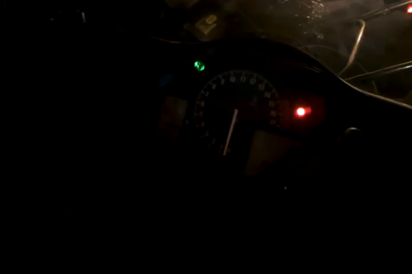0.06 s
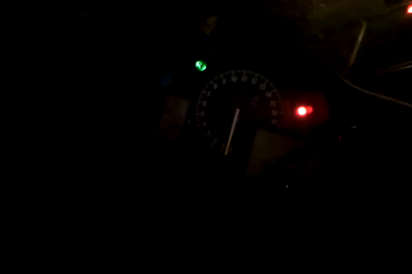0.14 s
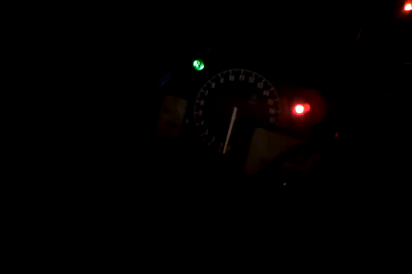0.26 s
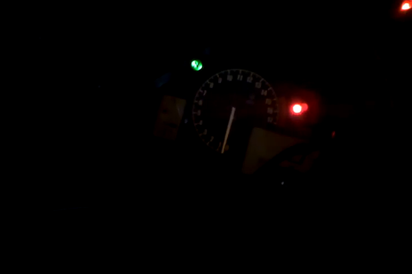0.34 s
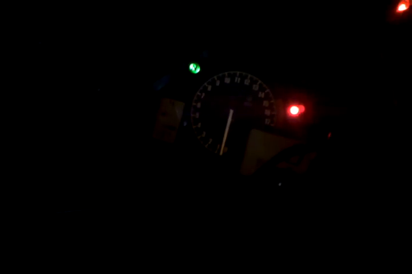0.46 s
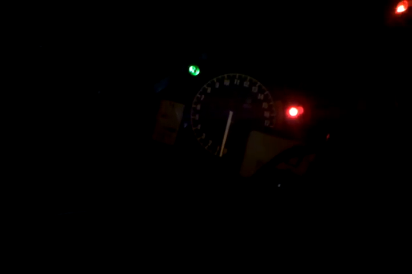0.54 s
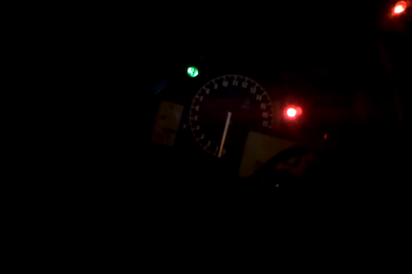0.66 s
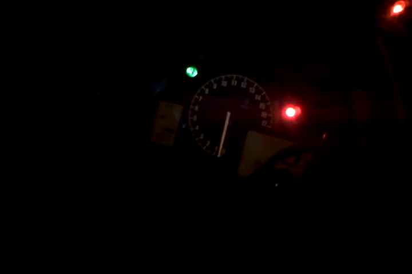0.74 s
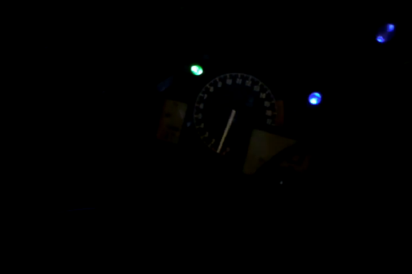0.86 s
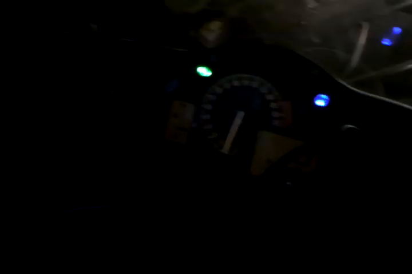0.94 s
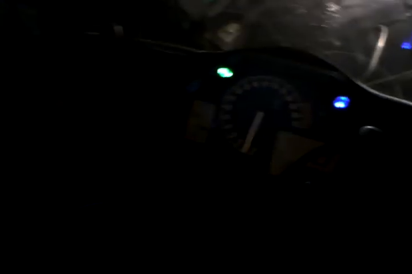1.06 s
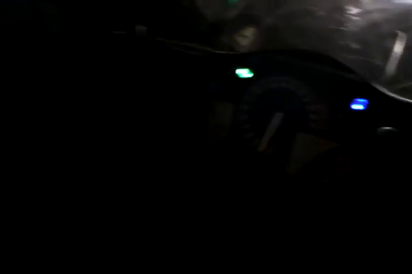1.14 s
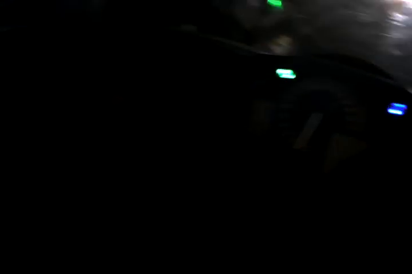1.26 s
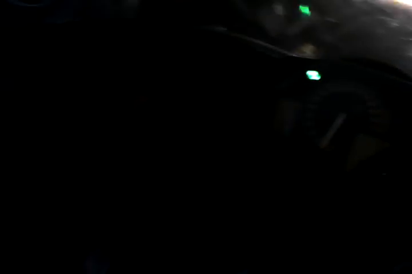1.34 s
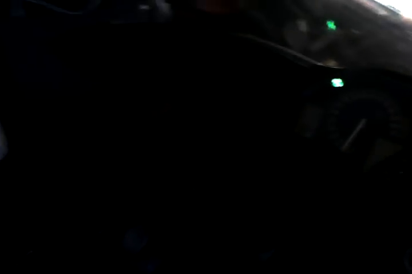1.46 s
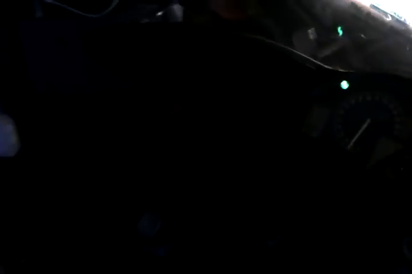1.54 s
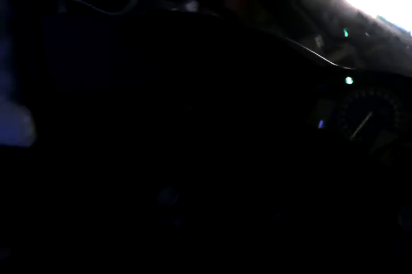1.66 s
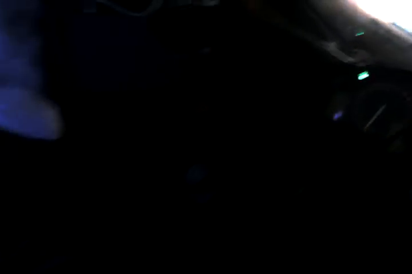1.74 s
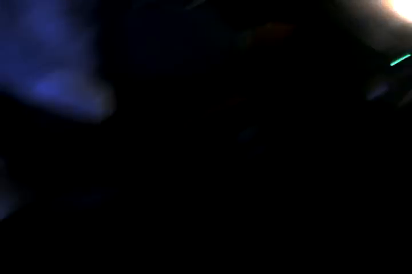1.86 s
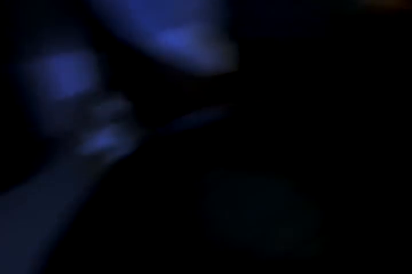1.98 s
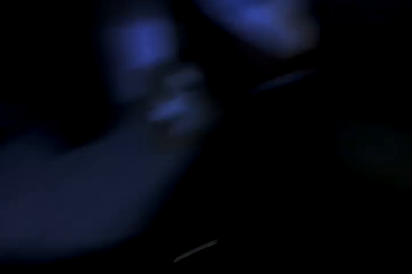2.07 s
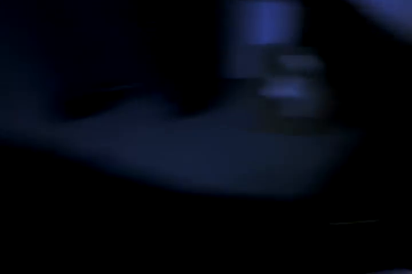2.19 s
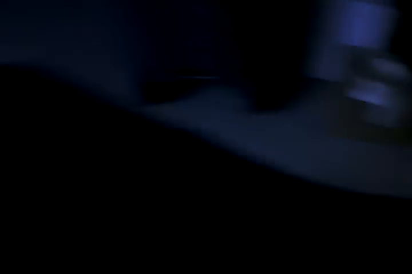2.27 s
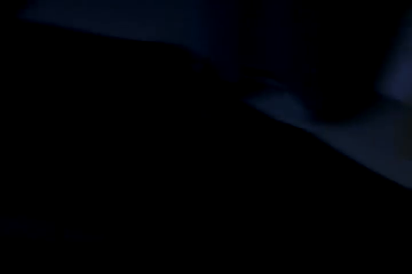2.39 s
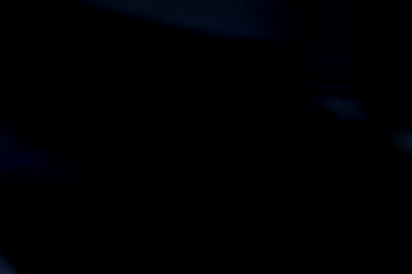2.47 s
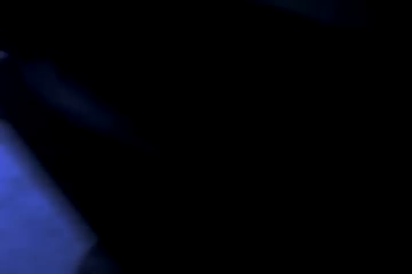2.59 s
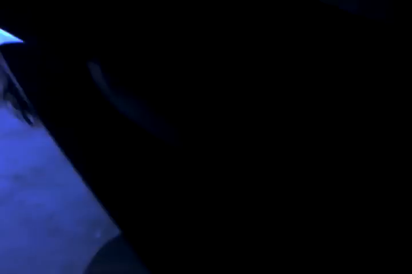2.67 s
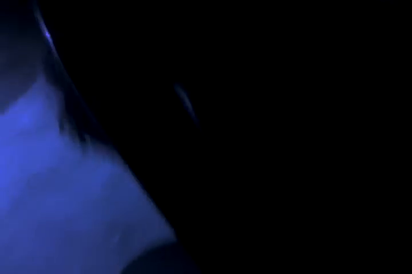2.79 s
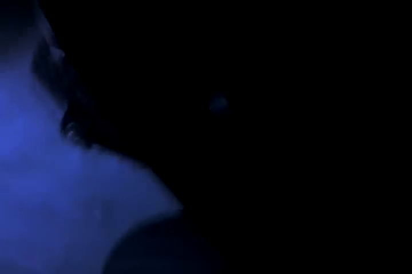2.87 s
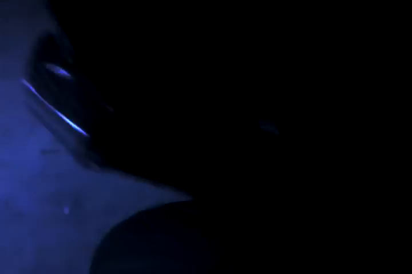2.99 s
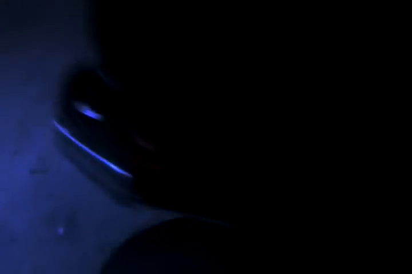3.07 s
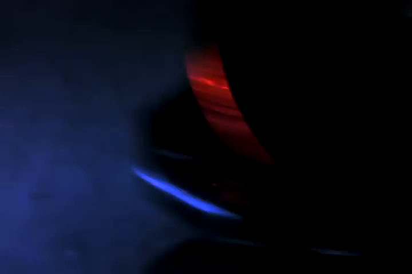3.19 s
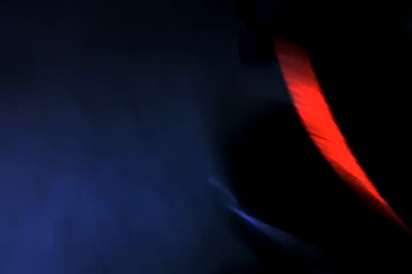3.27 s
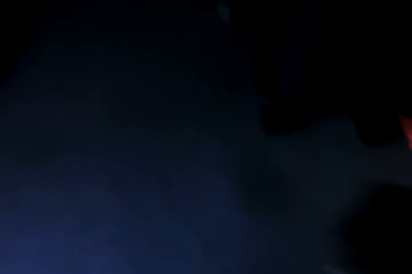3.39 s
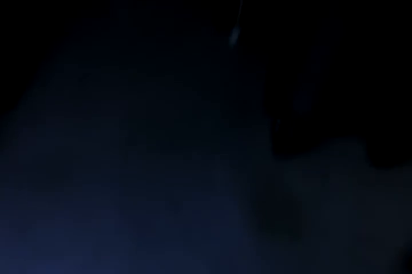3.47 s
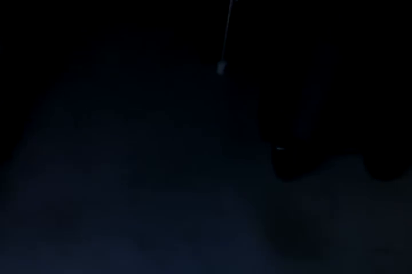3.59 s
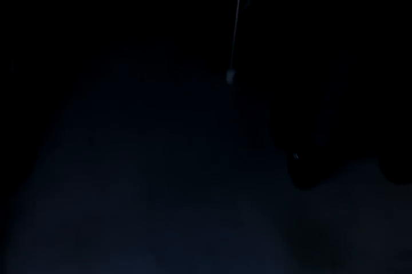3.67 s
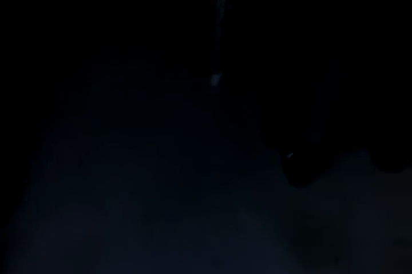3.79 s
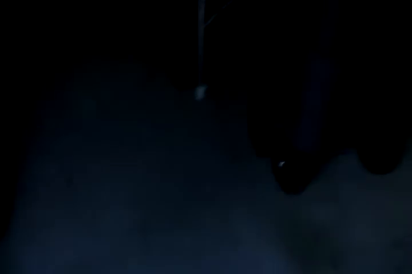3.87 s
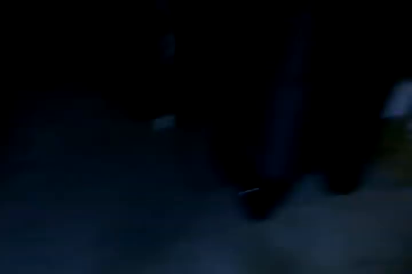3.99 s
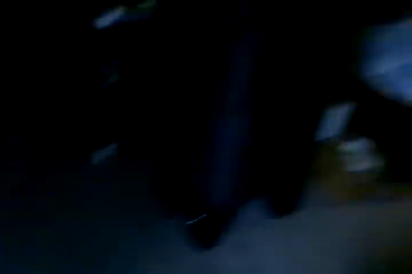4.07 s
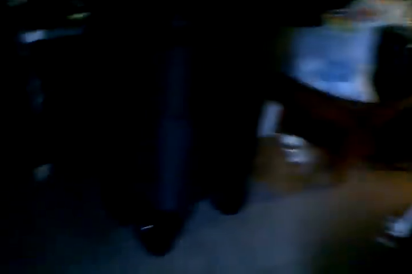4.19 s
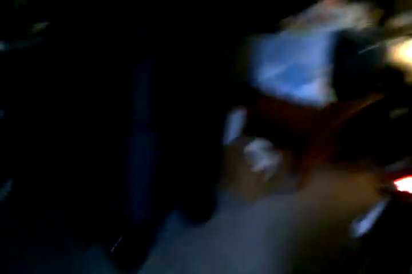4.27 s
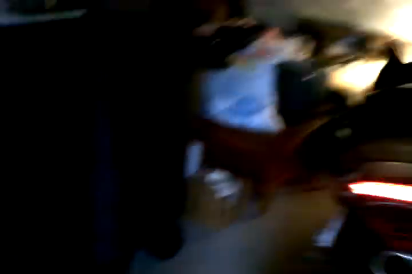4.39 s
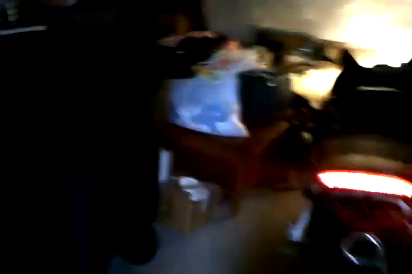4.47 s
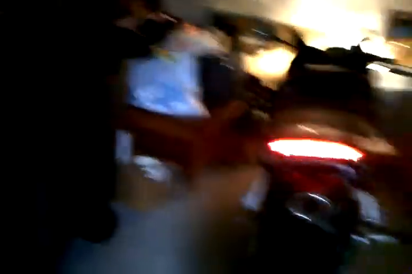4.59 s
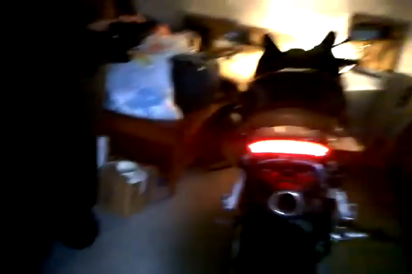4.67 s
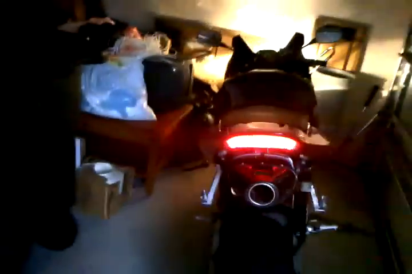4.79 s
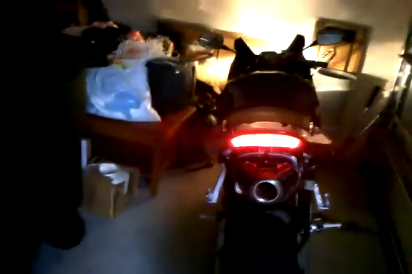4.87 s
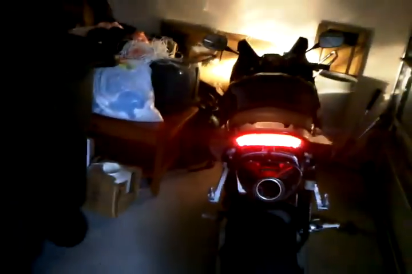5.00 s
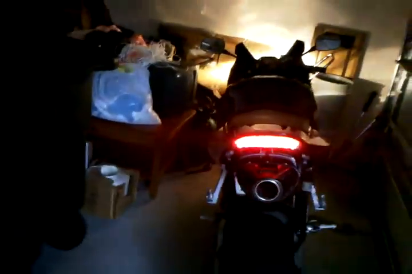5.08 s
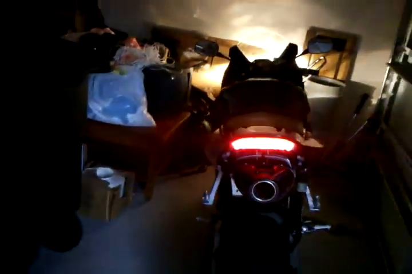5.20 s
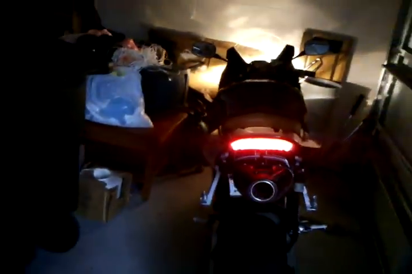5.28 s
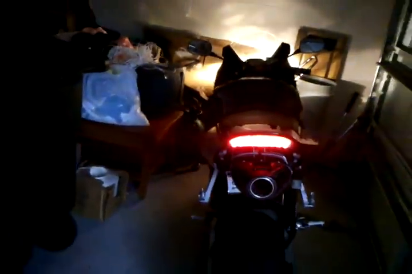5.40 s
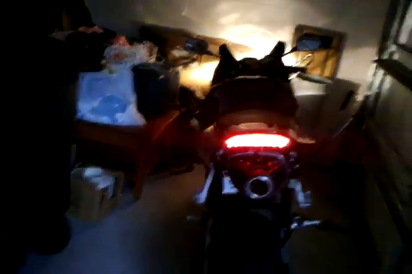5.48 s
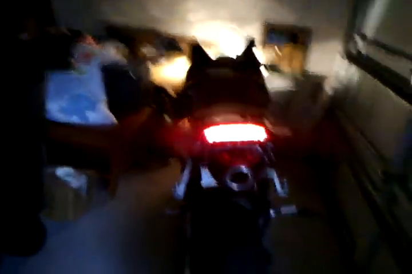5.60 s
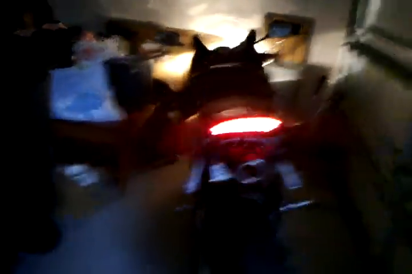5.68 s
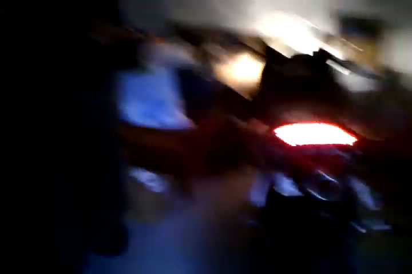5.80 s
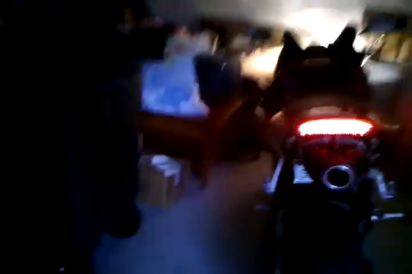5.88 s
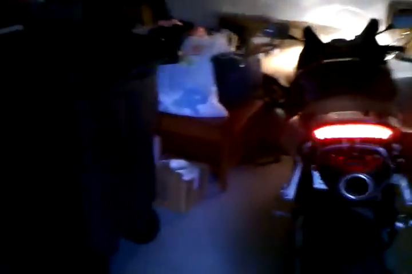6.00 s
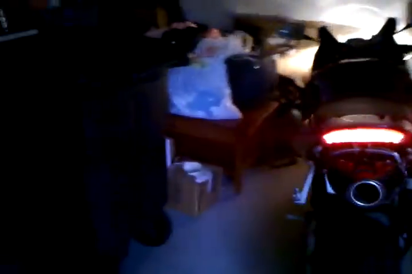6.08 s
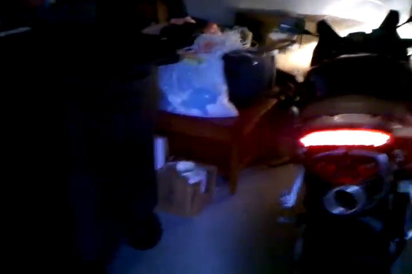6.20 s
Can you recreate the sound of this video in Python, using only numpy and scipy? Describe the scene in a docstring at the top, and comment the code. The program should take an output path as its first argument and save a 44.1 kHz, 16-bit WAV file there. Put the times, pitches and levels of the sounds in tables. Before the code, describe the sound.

A motorcycle starts in a garage: a soft pump hum, a few whining turns of the starter, and the engine fires with a brief flare. It settles into a rough, stumbling idle, its exhaust thumping off the walls over a metallic rattle. As the microphone is carried toward the tailpipe, the sound grows deeper and louder, popping and overloading for a moment, before dropping back to a droning, uneven idle.

```python
"""A four-cylinder motorcycle engine starts in a garage and idles unevenly, with misfires.
First the fuel pump hums and the starter whines through five compression strokes. Then each firing
sends a thump out of the exhaust pipe and sets the room booming, while chain and valves rattle.
The microphone is carried from the instruments, where the rattle is bright, through the room's
bass resonances to the tail; close to the pipe it overloads."""
import sys
import numpy as np
from scipy import signal
from scipy.fft import rfft, irfft
from scipy.io import wavfile
from scipy.ndimage import uniform_filter1d

SR = 44100
rng = np.random.default_rng(int(sys.argv[2]) if len(sys.argv) > 2 else 0)


def store_pcm(level_fs):
    """Save levels as 16-bit WAV."""
    pcm = np.round(np.clip(level_fs, -1, 1) * 32767).astype(np.int16)
    wavfile.write(sys.argv[1], SR, np.atleast_2d(pcm).T)


N = 275625
TIME = np.arange(N) / SR
STARTER_ON_S, CATCH_S, STARTER_OFF_S, RUNNING_S = .324, .8355, .895, 1.005


def from_db(db):
    """Turn decibels into a gain."""
    return 10 ** (np.asarray(db) / 20)


def rms_one(x):
    """Scale a sound to an average power of 1."""
    return x / np.sqrt(np.mean(x ** 2) + 1e-20)


def evened(x, seconds):
    """Even out the power to about 1 over every stretch of this length."""
    power = uniform_filter1d(uniform_filter1d(x ** 2, int(seconds * SR)), int(seconds * SR / 2))
    return x / np.sqrt(np.maximum(power, 0) + np.mean(x ** 2) / 400)


def in_time(rows):
    """Join a table's rows with straight lines: one curve for each column after the time."""
    s, *columns = np.transpose(rows)
    return [np.interp(TIME, s, c) for c in columns]


def keep(x, hz, kind, order=2):
    """Keep the lows, the highs or a band; a higher order gives a sharper edge."""
    sections = signal.butter(order, np.clip(hz, 10, .45 * SR), kind, fs=SR, output="sos")
    return signal.sosfilt(sections, x + 1e-18)


def resonate(x, hz, width_hz):
    """Ring at one pitch; the narrower the width, the longer the ring."""
    r = np.exp(-np.pi * width_hz / SR)
    feedback = [1, -2 * r * np.cos(2 * np.pi * hz / SR), r * r]
    return signal.lfilter(np.array([1, 0, -1]) * (1 - r * r) / 2, feedback, x + 1e-18)


def drift(hz):
    """A random wobble of typical size 1, up to about this fast."""
    knots = rng.standard_normal(int(N / SR * 2 * hz) + 2)
    return rms_one(np.interp(TIME * 2 * hz, np.arange(len(knots)), knots))


def noise(spectrum):
    """Noise of power 1, coloured by a table of pitches and levels, without deep bass."""
    hz, db = np.transpose(spectrum)
    bins = np.maximum(np.fft.rfftfreq(N, 1 / SR), 1)
    gains = from_db(np.interp(np.log(bins), np.log(hz), db))
    coloured = irfft(rfft(rng.standard_normal(N)) * gains, N)
    return rms_one(keep(coloured, 90, "high", order=5))


def echoes(x, fade_s):
    """Dense echoes off the garage walls, as strong as their source, falling 60 dB in fade_s."""
    t = TIME[:SR // 2]
    tail = rng.standard_normal(len(t)) * from_db(-60 * t / fade_s) * (t > .006)
    return np.std(x) * rms_one(signal.fftconvolve(x, tail)[:N])


# The pump's tones: f/Hz, level/dB
PUMP_TONES = [(1295, -87), (1750, -74.5)]
# Colour of the soft noise of pump and garage: f/Hz, relative level/dB
PUMP_COLOUR = [(47, -45.5), (80, -10), (97, -4.5), (117, 5), (181, -7.5), (223, -2), (314, -8),
               (426, -12.5), (1100, -17.5), (1310, -5), (1520, -20), (1800, -11), (2270, -20.5),
               (6570, -15.5), (7500, -28.5), (9750, -61.5), (16500, -120)]


def fuel_pump():
    """The pump hums faintly, wavering over the quiet of the garage."""
    hum = sum(from_db(db) * rms_one(resonate(rng.standard_normal(N), hz, 25)) for hz, db in PUMP_TONES)
    return hum + from_db(-57.5) * noise(PUMP_COLOUR)


# The starter spins up freely, then takes the engine's weight: t/s, gear tooth f/Hz, relative level/dB
STARTER_WHINE = [(.32, 792, -42.5), (.378, 1550, -22), (.42, 1810, -23), (.47, 1740, -20.5),
                 (.515, 1380, -28), (.6, 1110, -31.5), (.665, 1300, -28.5), (.83, 1350, -29),
                 (.92, 1220, -33.5)]
# Tones of the gears: multiple of the tooth rate, relative level/dB running free, the same under load
GEAR_TONES = [(.5, -7, -12), (1, -1, 2), (1.5, -6, -13), (2, -8, 8), (2.5, -8, -12), (3, -14, 4),
              (4, -18, 4), (5, -18, 2)]
# Pistons squeezing air, which loads the starter: t/s, half length/s, load from 0 to 1
SQUEEZES = [(0.48, 0.018, 0.34), (0.585, 0.0329, 0.76), (0.666, 0.026, 0.93), (0.749, 0.032, 0.99),
            (0.835, 0.031, 0.99)]
# Colour of the grinding gears: f/Hz, relative level/dB
GRIND_COLOUR = [(59, -72), (100, -38), (178, -3), (424, -24.5), (473, -19.5), (679, -10.5), (1050, -14.5),
                (1210, -11), (2080, -15), (2580, -9.5), (4610, -11.5), (6610, -6.5), (7500, -18.5),
                (9750, -8), (16500, -120)]


def starter():
    """The starter's switch knocks; its gears whine, chatter and grind, slowing through each squeeze."""
    load, lead = 0, 0
    for s, half_s, size in SQUEEZES:
        stroke = size * np.exp(-((TIME - s) / half_s) ** 2)
        load += stroke
        lead += stroke * (s - TIME) / half_s   # fast going in, slow coming out
    tooth_hz, whine_db = in_time(STARTER_WHINE)
    jitter = (.017 + .03 * load) * drift(250)
    teeth = 2 * np.pi * np.cumsum(tooth_hz * (1 + .12 * lead + jitter)) / SR
    whine = 0
    for multiple, free_db, loaded_db in GEAR_TONES:
        chatter_db = 3 * drift(44.93)
        whine += from_db(free_db + (loaded_db - free_db) * load + chatter_db) * np.sin(multiple * teeth)
    whine *= from_db(whine_db - 1.5 + 3.5 * load)
    whine += from_db(-1.5) * echoes(whine, fade_s=.29)
    engaged = 1 - np.exp(-np.maximum(TIME - STARTER_ON_S + .012, 0) / .029)
    grind = engaged * from_db(-26.5 + 9.5 * load) * noise(GRIND_COLOUR) * (1 + .51 * np.cos(teeth / 2))
    knock = noise([(100, -34), (250, -6), (500, -4.5), (900, -42), (7000, -2), (9000, -57)])
    knock *= from_db(-25.5) * np.exp(-abs(TIME - STARTER_ON_S) / .018)
    switch_on = np.interp(TIME, [STARTER_ON_S - .004, STARTER_ON_S], [0, 1])
    drop_out = from_db(-170 * np.maximum(TIME - STARTER_OFF_S, 0))
    return keep(whine + grind + knock, 92, "high", order=4) * switch_on * drop_out


# Firings that burn badly: t/s, level/dB compared with a normal one
MISFIRES = [(1.165, -10.0), (1.367, -4.0), (1.598, -7.7), (1.78, -7.7), (1.806, -2.0), (2.533, -8.1),
            (2.585, -4.1), (2.787, -3.1), (3.067, -6.4), (3.143, -8.2), (3.293, -14.5), (3.468, -6.5),
            (3.724, -4.0), (3.877, -4.9), (4.079, -10.7), (4.105, -18.8), (4.278, -10.6), (4.302, -9.0),
            (4.353, -4.1), (4.503, -3.2), (4.881, -7.3), (5.112, -9.2), (5.316, -13.7), (5.542, -6.0),
            (5.718, -8.8), (5.744, -7.3), (6.092, -4.4)]
# The speed that the idle control aims for: t/s, firing rate f/Hz
IDLE_SPEED = [(1.0, 39.67), (1.5, 39.14), (1.9, 39.43), (2.2, 39.86), (2.5, 40.2), (2.9, 39.3),
              (3.3, 40.72), (3.7, 38.84), (4.0, 40.08), (4.3, 41.75), (4.6, 38.55), (4.8, 40.67),
              (5.0, 38.85), (5.4, 40.29), (5.7, 40.1), (6.0, 40.41), (6.25, 39.5)]


def idle_swing(onset_s=.012, settle_s=.098, swing_hz=2.63):
    """Change in firings per second: a misfire slows the engine; the idle control overshoots, settles."""
    lost = np.zeros(N)
    for s, loss_db in MISFIRES:
        lost[int(s * SR)] = 1 - from_db(loss_db)
    t = TIME[:SR]
    sag = -5.9 * (1 - np.exp(-t / onset_s)) * np.exp(-t / settle_s)
    recovery = sag * np.cos(2 * np.pi * swing_hz * t)
    return signal.fftconvolve(lost, recovery)[:N]


def firings(swing):
    """Fuel burns in four unequal cylinders: gives one click per firing and a running count of them."""
    rate_hz = (in_time(IDLE_SPEED)[0] + swing) * (TIME > CATCH_S)
    count = np.cumsum(rate_hz) / SR
    at = np.flatnonzero(np.diff(np.floor(count)) > 0)
    chance = rng.standard_normal((len(at), 2))
    ragged = np.interp(at / SR, [1.0, 2.8], [3.6, 1])   # burning is uneven just after the start
    cylinder_db = np.resize([.85, -1.9, .96, -1.4], len(at))
    db = cylinder_db + ragged * chance[:, 0]
    for s, loss_db in MISFIRES:
        db[np.argmin(abs(at / SR - s))] += loss_db
    jitter = (.00022 * ragged * chance[:, 1] * SR).astype(int)
    clicks = np.zeros(N)
    clicks[np.clip(at + jitter, 0, N - 1)] = from_db(db)
    return clicks, count


def effort(swing, catching_db=-6.75, flare_db=5.25, flare_s=.09):
    """The exhaust is weak until all cylinders catch, flares briefly, then follows the speed swings."""
    start_db = np.interp(TIME, [RUNNING_S - .01, RUNNING_S], [catching_db, flare_db])
    fade = np.exp(-np.maximum(TIME - RUNNING_S, 0) / flare_s)
    return from_db(start_db * fade + .5 * swing)


def thumps(clicks, thump_hz=222.4, width_s=.0027):
    """Each firing leaves the silencer as one short pressure wave with a puff of gas."""
    t = np.arange(int(.016 * SR)) / SR - .0045
    shape = np.exp(-.5 * (t / width_s) ** 2) * np.clip((t - t[0]) / .002, 0, 1)
    wave = -np.cos(2 * np.pi * thump_hz * t - .7) * shape
    gas = keep(keep(clicks, 60, "low") * rng.standard_normal(N), [200, 1570], "band")
    thump = rms_one(signal.fftconvolve(clicks, wave)[:N]) + from_db(-28) * rms_one(gas)
    return keep(thump, 70, "high", order=5)   # the thumps carry little deep bass


# Pitches at which pipe and garage ring: f/Hz, width/Hz, relative level/dB
PIPE_RINGS = [(87.6, 7.3, 3), (130.4, 14.5, 1.5), (190.6, 9.4, -3), (294.5, 23, -5), (328, 22, -5.5),
              (416.7, 31, 5)]
# Wall echoes, strong while the motorcycle hides the pipe: t/s, level/dB over the direct sound
WALL_ECHOES = [(1.0, 7), (1.9, 3), (2.4, -2), (3.2, -6), (3.6, -11), (4.1, -12), (4.6, -10), (6.2, -8)]
# The walk from instruments to tail: t/s, then relative level/dB of thumps, room boom and room drone
EXHAUST_WALK = [(0.85, -27.5, -30, -28), (1.03, -24, -25.5, -25.5), (1.3, -24, -23.5, -26),
                (1.55, -22, -34.5, -23), (2.1, -20, -25, -25.5), (2.3, -20, -11.5, -21.5),
                (2.6, -19, -10.5, -21), (2.92, -18.5, -7.5, -19.5), (3.14, -15, -16, -20),
                (3.58, -12, -10, -14.5), (3.98, -15, -17.5, -19.5), (4.25, -16.5, -19.5, -22),
                (4.65, -19, -18, -20), (5.6, -22, -26, -19.5), (6.2, -21, -26.5, -19)]


def exhaust(thump, boom_hz=147.45, drone_hz=243):
    """The thumps ring in the pipe, echo off the walls and feed two standing waves in the garage."""
    pipe = thump + sum(from_db(db) * resonate(thump, hz, width) for hz, width, db in PIPE_RINGS)
    walk = .9 * np.pi * TIME   # the echo pattern changes as the microphone moves
    room = np.cos(walk) * echoes(pipe, fade_s=.4) + np.sin(walk) * echoes(pipe, fade_s=.4)
    pipe += from_db(in_time(WALL_ECHOES)[0]) * room
    # the standing waves swell when an overtone of the wandering idle lands on them
    boom = resonate(resonate(thump, boom_hz, 9.1), boom_hz, 92)
    drone = resonate(resonate(pipe, drone_hz, 17.5), drone_hz, 93)
    pipe_db, boom_db, drone_db = in_time(EXHAUST_WALK)
    return (from_db(pipe_db - .19) * evened(pipe, seconds=.22)
            + from_db(boom_db - 2.5) * evened(boom, seconds=.67)
            + from_db(drone_db - 3) * evened(drone, seconds=.26))


# Valves and chain along the walk: t/s, then relative level/dB of rattle, hiss and sizzle
CLATTER_WALK = [(0.95, -34.5, -31, -27.5), (1.9, -36, -35, -33), (2.05, -37, -38.5, -37),
                (2.63, -37, -36.5, -39), (2.98, -37.5, -34, -35), (3.6, -36.5, -36.5, -41),
                (3.67, -37.5, -37, -43.5), (4.47, -38.5, -36.5, -36), (4.72, -37.5, -36.5, -43),
                (5.26, -38.5, -37.5, -44), (5.94, -39, -37.5, -42), (6.07, -39, -41.5, -52),
                (6.2, -38.5, -40.5, -50.5)]
# Colour of the rattling metal: f/Hz, relative level/dB
RATTLE_COLOUR = [(220, -16.5), (380, -8), (404, -7), (482, -10), (692, -11), (745, -15.5), (1070, -14),
                 (1320, -15), (1920, -13.5), (2320, -17.5), (2660, -14.5), (3370, -12.5), (5030, -16),
                 (6700, -9.5), (7500, -21.5), (9750, -55.5), (16500, -120)]
# Pitches at which the engine covers ring: f/Hz, width/Hz, relative level/dB
COVER_RINGS = [(1200, 70, -8), (4930, 130, -3)]


def clatter(count):
    """Chain and gears rustle, pulsing with each stroke, and valves tick into the engine covers."""
    stroke = 2 * np.pi * count
    pulse = 1 + .078 * (np.cos(stroke - 1.6) + .41 * np.cos(2 * stroke - 2.5) + .39 * np.cos(stroke / 2))
    valve_hits = np.diff(np.floor(2 * count + .6), prepend=0) > 0   # two per firing
    taps = valve_hits * from_db(1.5 * rng.standard_normal(N))
    ticks = signal.lfilter([1], [1, -np.exp(-1 / (.003 * SR))], taps)   # each dies away in about 3 ms
    metal = noise(RATTLE_COLOUR) * (pulse + from_db(-17) * ticks) * from_db(.89 * drift(22))
    metal += sum(from_db(db) * resonate(metal, hz, width) for hz, width, db in COVER_RINGS)
    rustle = pulse * rng.standard_normal(N)
    rattle_db, hiss_db, sizzle_db = in_time(CLATTER_WALK)
    rattle = from_db(rattle_db + 4) * rms_one(keep(metal, 3030, "low", order=7))
    hiss = from_db(hiss_db + .5) * rms_one(keep(metal, [3500, 5400], "band", order=5))
    sizzle = from_db(sizzle_db) * rms_one(keep(rustle, [5400, 7150], "band", order=4))
    return (rattle + hiss + sizzle) * np.interp(TIME, [.86, .92], [0, 1])


def pipe_pops(clicks, pass_s=3.56, half_length_s=.29):
    """As the microphone passes close to the pipe, each firing is a push of air with a sharp crack."""
    closeness = np.exp(-((TIME - pass_s) / half_length_s) ** 4)
    push = rms_one(keep(clicks, [15, 45], "band")) * (1 + .48 * drift(19))
    at_peak = np.roll(clicks, int(.004 * SR))   # the crack comes at the top of the push
    crack = rms_one(keep(at_peak, [750, 1320], "band"))
    return closeness * (from_db(-47) * push + from_db(-36) * crack)


def scene():
    """Pump, starter and running engine add up at one microphone."""
    swing = idle_swing()
    clicks, count = firings(swing)
    engine = effort(swing) * (exhaust(thumps(clicks)) + pipe_pops(clicks)) + clatter(count)
    return (engine + starter() + fuel_pump())[None]


def record(dry):
    """The microphone loses the highest treble and flattens the peaks of the strongest thumps."""
    dulled = keep(dry, 7070, "low", order=14)
    clipped = np.clip(dulled, -.71, .71)
    return keep(clipped, 8600, "low", order=12)


dry = scene()
out = record(dry)
store_pcm(out)
```